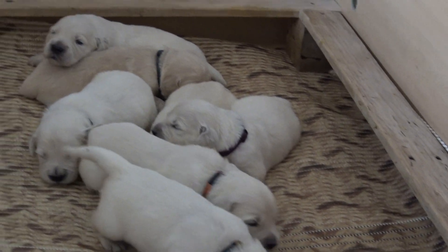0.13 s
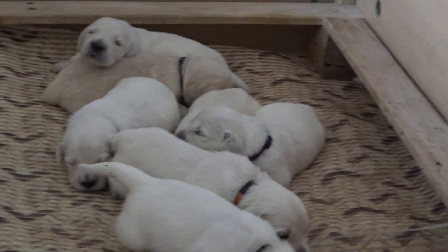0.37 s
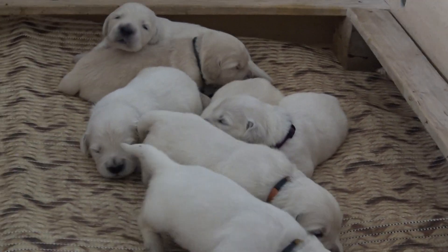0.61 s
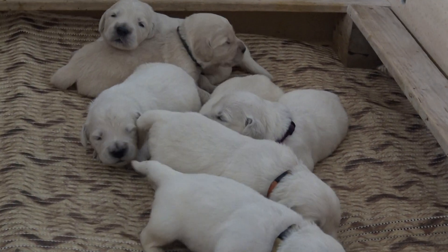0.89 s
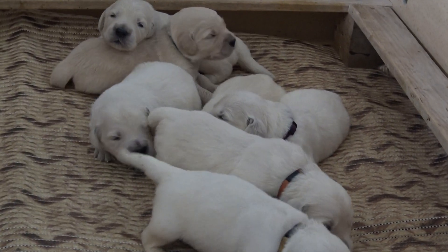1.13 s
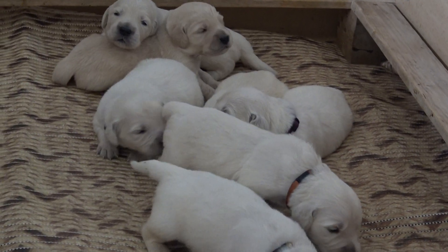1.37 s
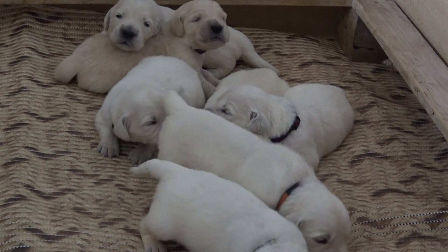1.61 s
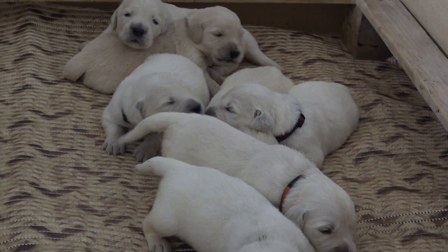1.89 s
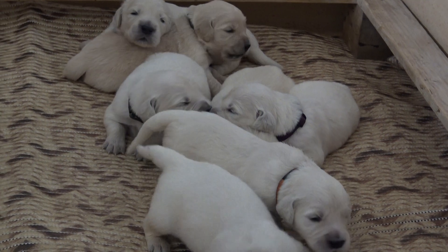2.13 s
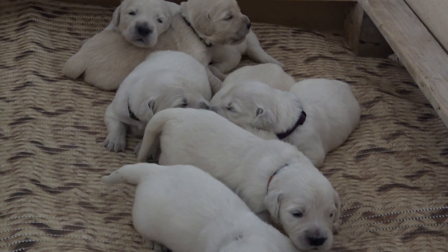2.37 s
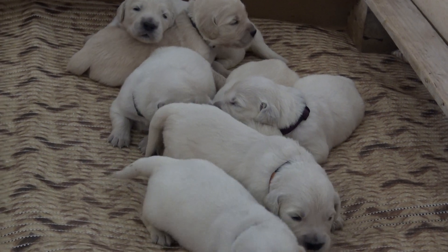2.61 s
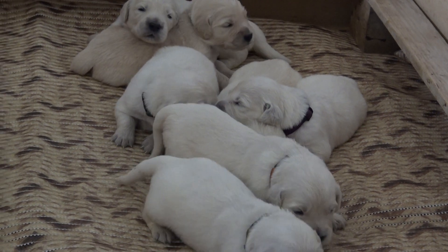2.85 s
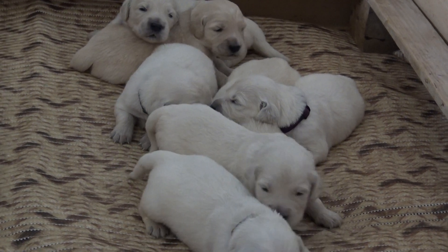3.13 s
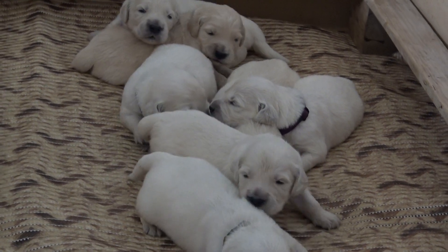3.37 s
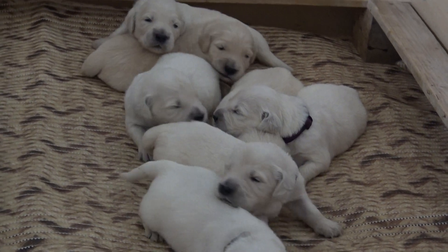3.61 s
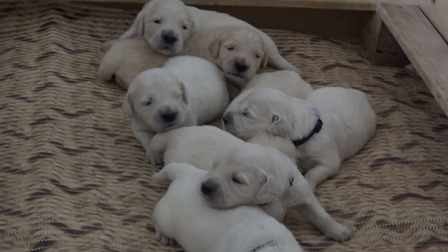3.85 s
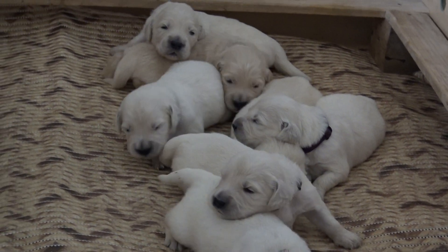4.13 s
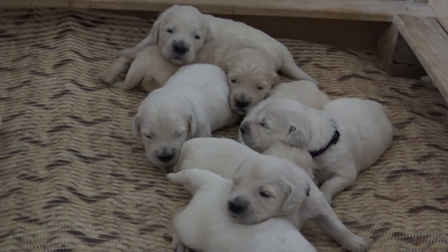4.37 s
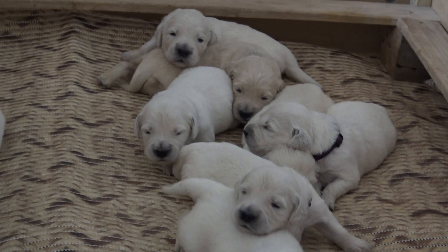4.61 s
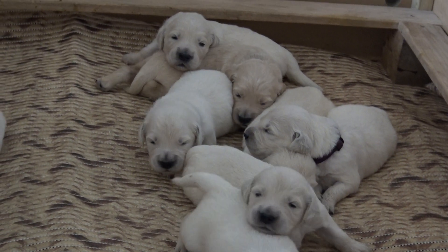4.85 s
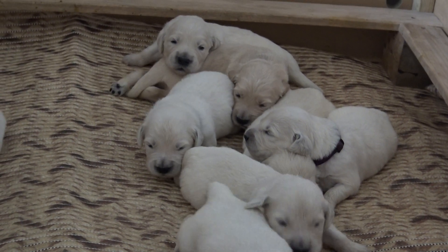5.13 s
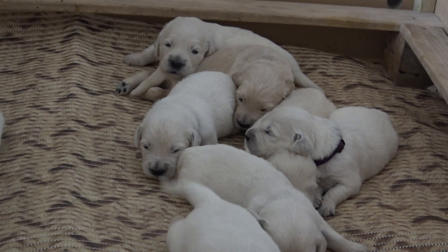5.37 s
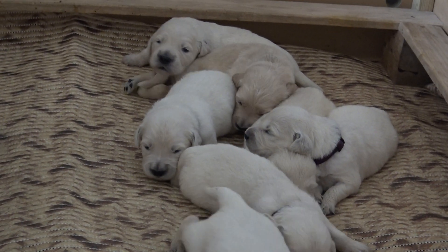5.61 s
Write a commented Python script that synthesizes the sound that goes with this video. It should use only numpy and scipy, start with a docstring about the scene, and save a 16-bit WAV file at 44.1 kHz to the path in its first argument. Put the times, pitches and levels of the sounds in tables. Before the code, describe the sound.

The stretch opens in the tail of a loud hoarse squeal, then further cries follow at an even pace, alternating forceful raspy ones with weaker, clearer whines. Between them come low muffled littermate grunts, tiny whimpers and light scratchy scuffs; a dull knock falls near the end as the last cry begins. The sound is near-centred, slightly distant, with a half-second room tail and almost silent background.

```python
"""Newborn puppy crying in a pen

A bare room, a wooden pen, two microphone ports a couple of metres off. About every 0.4 s the puppy cries:
partials on a running phase rise, jump to the first throat resonance, often turn hoarse and drop in pitch.
Behind it litter mates grunt and whimper with the same voice model through closed mouths; noise grains make paws
on the mat, damped swings make soft low knocks, narrow noise makes squeaks of indrawn air. Steady noise is the
room's air, and a tail of decaying noise bands rings on after every cry."""
import sys
import numpy as np
from scipy import signal
from scipy.fft import rfft, irfft, next_fast_len
from scipy.io import wavfile
from scipy.ndimage import uniform_filter1d, minimum_filter1d

SR = 44100
rng = np.random.default_rng(int(sys.argv[2]) if len(sys.argv) > 2 else 0)


def materialize(psi):
    """Save the field psi as 16-bit PCM at rate SR to the path in sys.argv[1].

    A 1-D psi becomes a single channel; in a 2-D psi each row is a channel.
    """
    bounded = np.clip(np.atleast_2d(psi).T, -1, 1)
    quanta = np.round(bounded * 32767).astype(np.int16)
    wavfile.write(sys.argv[1], SR, quanta)


def natural_amplitude(level_db):
    """Convert a level in decibels to a linear amplitude factor, elementwise."""
    exponent = np.asarray(level_db, float) / 20
    return 10 ** exponent


N = 252693
LEAD = SR // 4  # samples run ahead of time zero, cut off at the end
TIME = (np.arange(N + LEAD) - LEAD) / SR  # s
TOP_HZ = 16300  # limit of the voice partials and of the microphone channel

# steady air of the room, relative spectrum: (frequency [Hz], gain [dB])
AIR_TONE = [(15, -50), (25, -32), (150, -26.5), (230, -16), (489, -12.5), (1520, -27), (1890, -18),
            (3820, -26), (4490, -38), (5430, -28), (6050, -27.5), (10000, -33), (16000, -45)]
AIR_DB = -61.5  # rms

# decay of the room, one row a band from low to high: (nominal frequency [Hz], time to fall 60 dB [s])
ROOM_T60 = [(250, 0.45), (1000, 0.52), (2000, 0.4), (4000, 0.47), (8000, 0.38), (14000, 0.15)]
ROOM_DB, ROOM_GAP_S = -3.5, 0.0012  # tail level; wait for the first wall

# what the side signal keeps of its sources: (frequency [Hz], gain [dB])
SIDE_TONE = [(60, -15.5), (200, -29.5), (1000, -27), (2400, -23.5), (4400, -19), (8500, -11),
             (10500, -11.5), (12500, -22)]

# soft low bumps and knocks: (time [s], level before damping [dB], frequency [Hz])
BUMPS = [(.94, -56, 110), (1.005, -54.5, 80), (1.36, -50, 250), (5.513, -37.5, 348)]
BUMP_CYCLES = 1.4  # cycles in which a bump falls to 1/e

# paws and fur on the mat: (time [s], level before tone shaping [dB], decay [s])
SCUFFS = [(0.184, -60.5, 0.14), (0.852, -58, 0.047), (1.356, -65.5, 0.029), (1.51, -59, 0.04),
          (2.162, -57.5, 0.081), (2.311, -60, 0.049), (2.517, -55, 0.012), (2.977, -49, 0.047),
          (3.443, -68, 0.054), (4.18, -55.5, 0.043), (4.548, -52, 0.038), (5.344, -49, 0.006),
          (5.372, -51, 0.0044)]
# tone of the scuffs: (frequency [Hz], gain [dB])
SCUFF_TONE = [(100, -7), (400, 3.5), (1500, 16.5), (3000, 11), (6000, 6), (10000, -5), (15000, -22)]

# litter mates' grunts: (time [s], length [s], pitch [Hz], peak level of the fundamental [dB])
GRUNTS = [(0.351, 0.092, 265.5, -50.5), (0.939, 0.071, 249.8, -50), (1.527, 0.049, 205, -54),
          (1.764, 0.14, 264.5, -48.5), (2.172, 0.057, 247.4, -51), (2.447, .15, 268.5, -48),
          (3.086, 0.17, 247.5, -47.5), (3.59, .16, 252.6, -50.5), (4.065, 0.31, 262, -50),
          (4.726, 0.26, 261, -51.5), (5.619, 0.045, 252, -58)]
# course of every grunt: (time [share of length], pitch [share], level under the peak [dB], brightness [dB])
GRUNT_SHAPE = [(-.12, .97, -14, 2), (.08, .98, -3, 4), (.35, 1.02, 0, 3), (.75, 1, -4, 2),
               (1, .97, -14, -4)]
# litter mates' rising or level whimpers:
# (time [s], length [s], first pitch [Hz], last pitch [Hz], peak level of the fundamental [dB])
WHIMPERS = [(3.435, .06, 520, 800, -35), (1.04, .075, 395, 425, -47), (2.5, .07, 800, 790, -41)]
# the mates' closed mouths: (frequency [Hz], gain [dB])
NOSE = [(120, -9.5), (260, -1), (380, -2), (520, -11), (800, -5), (1600, -20.5), (3000, -41.5), (8000, -70)]
GRUNT_HOARSE, WHIMPER_HOARSE = 0.6, 0.2  # hoarseness 0-1, also the share of the second mode
WHIMPER_SWELL_DB, WHIMPER_FADE_DB = -8, -20  # first and last level against the peak

# squeaks of indrawn air after some cries: (time [s], level before halving [dB], frequency [Hz])
SQUEAKS = [(0.4594, -45, 14700), (1.3044, -48, 15200), (1.7115, -51, 14400), (2.137, -52, 14700),
           (2.9931, -59, 14100)]
SQUEAK_S = 0.007  # from the peak to 1/e

# one row a cry: (hoarseness scale [0-1], hoarse spell [s], extra brightness above the register [dB],
# course up to the closing break as points (time [s], pitch [Hz], level of the fundamental [dB]))
CRIES = [ (0.64, 0.177, -2, [(-.2, 950, -36), (-.15, 1411, -26), (-.1, 1550, -18.5), (.01, 1510, -36.5),
         (.04, 1452, -26)]), (0.79, 0.101, 0.5, [(.2, 896, -49), (.225, 1012, -28.5), (.24, 1097, -29.5),
         (.252, 1312, -28), (.285, 1462, -11), (.345, 1693, -30), (.39, 1583, -31), (.43, 1437, -24.5)]),
         (0.33, 0.052, -6, [(.625, 786, -41), (.675, 1013, -29.5), (.685, 1108, -34.5), (.697, 1292, -28.5),
         (.74, 1418, -32), (.78, 1319, -23.5), (.81, 1245, -37), (.835, 1227, -32)]),
         (0.7, 0.0684, 0, [(1.03, 855, -42), (1.066, 1149, -34), (1.08, 1235, -37.5), (1.095, 1409, -23),
         (1.12, 1579, -16.5), (1.155, 1692, -27.5), (1.2, 1705, -29), (1.29, 1438, -32.5)]),
         (0.59, 0.066, -3, [(1.468, 851, -45), (1.505, 1105, -33.5), (1.522, 1165, -29.5),
         (1.53, 1388, -39), (1.555, 1349, -23.5), (1.575, 1470, -15), (1.6, 1620, -22.5),
         (1.695, 1462, -27)]), (0.827, 0.097, 1.5, [(1.872, 879, -42), (1.89, 990, -31),
         (1.915, 1111, -35.5), (1.93, 1355, -28.5), (1.965, 1495, -15.5), (2.0, 1615, -27),
         (2.04, 1622, -39), (2.118, 1486, -24.5)]), (.02, 0.028, -4.5, [(2.298, 926, -43.5),
         (2.32, 918, -34), (2.35, 1075, -31.5), (2.375, 1206, -35), (2.405, 1363, -27), (2.445, 1335, -28),
         (2.475, 1205, -33.5), (2.51, 1020, -30.5)]), (0.28, 0.073, 2, [(2.685, 928, -41.5),
         (2.71, 1053, -31.5), (2.727, 1352, -40), (2.74, 1436, -23.5), (2.78, 1519, -13),
         (2.81, 1549, -26.5), (2.825, 1771, -29.5), (2.9, 1700, -35.5), (2.97, 1576, -40)]),
         (0.0072, 0.038, -1.5, [(3.15, 841, -54), (3.17, 862, -37), (3.2, 1074, -31), (3.215, 1220, -41.5),
         (3.228, 1394, -31), (3.265, 1457, -20), (3.31, 1436, -26.5), (3.395, 1202, -34.5)]),
         (0.41, .12, 3, [(3.555, 848, -43), (3.6, 1068, -34), (3.612, 1370, -37.5), (3.635, 1503, -13),
         (3.66, 1567, -23), (3.675, 1613, -25.5), (3.77, 1556, -37), (3.815, 1490, -31.5)]),
         (0.034, 0.028, 3.5, [(3.978, 803, -38.5), (4.0, 911, -28), (4.018, 1066, -26.5),
         (4.035, 1281, -39), (4.055, 1417, -25.5), (4.08, 1440, -19.5), (4.12, 1404, -31),
         (4.17, 1313, -26)]), (0.39, 0.077, 0.5, [(4.325, 815, -39), (4.355, 962.5, -22.5),
         (4.372, 1087, -26), (4.382, 1367, -31.5), (4.41, 1424, -14.5), (4.445, 1530, -20.5),
         (4.5, 1498, -30.5), (4.555, 1413, -27)]), (0.47, .04, -4, [(4.722, 776, -44), (4.775, 978, -26),
         (4.805, 1051, -34), (4.815, 1030, -29), (4.822, 1358, -26.5), (4.87, 1427, -30.5),
         (4.905, 1350, -28), (4.928, 1238, -24)]), (0.74, .03, -1.5, [(5.09, 739.3, -44), (5.128, 933, -25),
         (5.15, 1062, -28.5), (5.165, 1242, -21.5), (5.2, 1467, -12), (5.24, 1446, -44),
         (5.27, 1476, -24.5), (5.29, 1318, -26.5)]), (0.58, 0.057, -1.5, [(5.488, 895, -45),
         (5.51, 990, -25.5), (5.527, 1067, -24.5), (5.54, 1387, -19), (5.57, 1513, -13.5),
         (5.6, 1618, -15.5), (5.62, 1727, -28.5), (5.7, 1717, -26)]), ]
# strength of the slower fold mode in each cry in turn, scaled further by its hoarseness: (level [dB])
LOW_MODE_DB = [0.5, -1, -0.5, 1.5, 3.5, 1.5, -12, 10.5, -4, 2.5, 9, 1.5, -7, -3, 2.5]
# the closing break: (time after the last point [s], pitch [share of the last], level against the last [dB])
BREAK = [(.007, .72, -10), (0.023, 0.612, -14.5)]
# mouth opening with pitch, which lets the upper partials out: (pitch [Hz], brightness [dB])
MOUTH = [(850, -16.5), (1000, -6), (1100, -3.5), (1300, 9), (1500, 5), (1700, 3.5)]
# the crying puppy's throat and mouth, peaks of a short tube and valleys: (frequency [Hz], gain [dB])
THROAT = [(150, -38.5), (500, -19.5), (950, -8), (1500, 5), (1950, -4.5), (2450, -16.5), (2950, -30),
          (3700, -33), (4430, -16.5), (5200, -31), (7250, -20.5), (8700, -32), (9300, -36), (10300, -37),
          (11300, -44.5), (14500, -50.5), (16000, -89)]
LOW_MODE_HZ = 975  # the slower way the folds can swing
LOCK_HZ = 1530  # above this pitch one fold stays locked to the first throat resonance
REGISTER_HZ, REGISTER_WIDTH_HZ = 1130, 100  # where the upper register begins, and its blend
CLEAR_HOARSE, LASTING_HOARSE = 0.06, 0.15  # shares of hoarseness in the low register and late in the cry
LOW_MODE_LASTS = 0.17  # share of the slower mode left late in the cry
CLOSING_DB = -15.5  # brightness change from the last point on
FULL_CRY_DB = -15  # level at which effort leaves the slope alone
MUFFLE = 0.45  # dB an octave of extra slope for each dB that the mouth is closed

CEILING, LOPSIDED = 0.37, 0.01  # limiter peak; share of squared sound in the microphone


def gain_at(points, hz):
    """Gain of (Hz, dB) points joined on a log-frequency axis."""
    at, db = np.transpose(points)
    return natural_amplitude(np.interp(np.log(hz), np.log(at), db))


def colour(x, points):
    """Shape the spectrum of a signal by (Hz, dB) points."""
    size = next_fast_len(len(x) + 999)
    bins = np.maximum(np.arange(size // 2 + 1) * SR / size, 1)
    return irfft(rfft(x, size) * gain_at(points, bins), size)[:len(x)]


def wobble(size, hz):
    """Random motion up to about hz, spread 1."""
    lowpass = signal.butter(2, hz, fs=SR, output="sos")
    x = signal.sosfilt(lowpass, rng.standard_normal(size + 999))[999:]
    return x / x.std()


def air():
    """The faint steady noise of the room."""
    x = colour(rng.standard_normal(len(TIME)), AIR_TONE)
    return natural_amplitude(AIR_DB) * x / x.std()


def room(x):
    """Diffuse tail: noise dying away band by band, after the first wall's delay."""
    t = np.arange(int(0.9 * SR)) / SR
    edges = [40, 500, 1400, 2800, 5600, 11000, 18000]  # Hz
    tail = 0
    for (_, t60), low, high in zip(ROOM_T60, edges, edges[1:]):
        bandpass = signal.butter(2, [low, high], "bandpass", fs=SR, output="sos")
        band = signal.sosfilt(bandpass, rng.standard_normal(len(t)))
        fade = np.exp(-np.log(1000) * t / t60)
        tail = tail + band * fade / np.sqrt(np.sum(fade ** 2))
    onset = np.clip(t / ROOM_GAP_S - 1, 0, 1)
    return signal.fftconvolve(x, tail * onset)[:len(x)]


def bumps():
    """Dull knocks: one heavily damped swing each."""
    out = 0
    for s, db, hz in BUMPS:
        turns = np.maximum(TIME - s, 0) * hz
        envelope = np.minimum(turns, 1) * np.exp(-turns / BUMP_CYCLES)
        out = out + natural_amplitude(db) * envelope * np.sin(2 * np.pi * turns)
    return out


def scuffs():
    """Short bursts of dense scratch grains that start sharply and die away."""
    grains = rng.standard_normal(len(TIME)) * natural_amplitude(5.17 * wobble(len(TIME), 590))
    shape = 0
    for s, db, decay_s in SCUFFS:
        age = np.maximum(TIME - s, 0)
        shape = shape + natural_amplitude(db) * np.minimum(age / 0.003, 1) * np.exp(-(age / decay_s) ** 2)
    return colour(grains * shape, SCUFF_TONE)


def stack(phase, hz, slope_db, bright_db, count):
    """Partials on a running phase, sloped by slope_db an octave and spread over the cycle."""
    order = np.arange(1, count + 1)[:, None]
    weight = natural_amplitude(slope_db * np.log2(order) + bright_db * (order > 1)) * (order * hz < TOP_HZ)
    return (weight * np.cos(order * phase + 0.38 * order ** 2)).sum(axis=0)


def voice(calls, tract, tilt_db, effort, drift, jitter, shimmer, second, second_hz, lock_hz,
          breath_db, flutter_hz):
    """Vocal folds as partials; hoarse folds lose time, swing in a second mode as well and leak air."""
    out = np.zeros(len(TIME))
    for call in calls:
        s, *columns = np.transpose(call)
        inside = np.flatnonzero((TIME > s[0] - 0.006) & (TIME < s[-1] + 0.03))
        t = TIME[inside]
        hz, db, hoarse, bright_db, low_mode = (np.interp(t, s, c) for c in columns)
        hoarse = np.clip(hoarse, 0, 1)

        # a fall of more than a fifth of the pitch is a break into the lower mode, not a glide
        points_hz = columns[0]
        for k in np.flatnonzero(points_hz[1:] < 0.8 * points_hz[:-1]):
            hz[(t > s[k]) & (t < s[k + 1])] = points_hz[k + 1]
        hz = uniform_filter1d(hz, size=SR // 250)
        # the voice drops out during the break
        pitch_speed = np.gradient(np.log(hz)) * SR
        hold = uniform_filter1d(np.exp(-(pitch_speed / 40) ** 2), size=SR // 500)

        def running_phase(pitch):
            unsteady = drift * wobble(len(t), 53) + jitter * hoarse * wobble(len(t), flutter_hz)
            return 2 * np.pi / SR * np.cumsum(pitch * (1 + unsteady))

        phase = running_phase(hz)
        locked = running_phase(np.minimum(hz, lock_hz))

        # more effort closes the folds harder and lifts the upper partials
        slope_db = tilt_db + effort * (db - FULL_CRY_DB) + MUFFLE * np.minimum(bright_db, 0)
        # the locked fold beats with the free one
        split = 0.22 * np.clip((hz - lock_hz) / 120, 0, 1)
        folds = stack(phase, hz, slope_db, bright_db, count=18)
        folds += split * stack(locked, hz, slope_db, bright_db, count=7)
        folds *= 1 + hoarse * shimmer * wobble(len(t), flutter_hz)

        # the slower mode comes and goes; it sounds alone and as sum and difference tones
        low = 2 * np.pi / SR * np.cumsum(second_hz * (1 + 0.282 * hoarse ** 2 * wobble(len(t), 191)))
        strength = second * low_mode * natural_amplitude(5.96 * wobble(len(t), 110) + 0.82 * (db - db.max()))
        folds += strength * (np.cos(locked + low) + 0.049 * np.cos(locked - low)
                             + 0.042 * np.cos(low) + 0.056 * np.cos(2 * low))
        upper_tones = sum(np.cos(k * phase - low) + np.cos(k * phase + low) for k in range(2, 7))
        folds += 0.15 * strength * natural_amplitude(bright_db) * upper_tones

        # air escapes once a cycle, while the folds stand open
        leak = natural_amplitude(breath_db + bright_db) * (hoarse + 0.03) * (1 + np.cos(phase))
        folds += leak * rng.standard_normal(len(t))

        fade_in = np.clip((t - s[0]) / 0.0013 + 1, 0, 1)
        fade_out = np.clip((s[-1] - t) / 0.0016 + 1, 0, 1)
        # dividing by the tract's gain keeps the fundamental at its own level
        level = np.sqrt(2) * natural_amplitude(db) / gain_at(tract, hz)
        out[inside] += folds * hold * fade_in * fade_out * level
    return colour(out, tract)


def grunt(s, length, hz, db):
    """Voice controls (s, Hz, dB, hoarseness, brightness dB, second mode) of one grunt."""
    return [(s + at * length, share * hz, db + down, GRUNT_HOARSE, bright_db, GRUNT_HOARSE)
            for at, share, down, bright_db in GRUNT_SHAPE]


def whimper(s, length, first_hz, last_hz, db):
    """Voice controls of one whimper: it swells, reaches its pitch and fades."""
    course = [(s, first_hz, db + WHIMPER_SWELL_DB),
              (s + 0.776 * length, last_hz, db),
              (s + length, last_hz, db + WHIMPER_FADE_DB)]
    return [point + (WHIMPER_HOARSE, 0, WHIMPER_HOARSE) for point in course]


def litter_mates():
    """Grunts and whimpers: unsteady folds heard through closed mouths."""
    calls = [grunt(*g) for g in GRUNTS] + [whimper(*w) for w in WHIMPERS]
    return voice(calls, NOSE, tilt_db=-2.0, effort=0.0077, drift=0.036, jitter=0.07, shimmer=0.85,
                 second=0.34, second_hz=133.0, lock_hz=TOP_HZ, breath_db=-25.0, flutter_hz=79.0)


def squeaks():
    """Indrawn air: narrow noise near 15 kHz, about 15 ms long."""
    out = 0
    for s, db, hz in SQUEAKS:
        shape = natural_amplitude(db) * np.exp(-((TIME - s) / SQUEAK_S) ** 2)
        out = out + shape / 2 * wobble(len(TIME), 70) * np.cos(2 * np.pi * hz * TIME)
    return out


def cry(hoarseness, hoarse_s, open_db, course, low_db):
    """Voice controls, columns as in grunt(), of one cry ending in the break to the low mode."""
    last_s, last_hz, last_db = course[-1]
    closing = [(last_s + dt, share * last_hz, last_db + down) for dt, share, down in BREAK]
    s, hz, db = np.transpose(course + closing)
    # hoarseness sets in with the jump above the register and then clears
    upper = np.clip((hz - REGISTER_HZ) / REGISTER_WIDTH_HZ, 0, 1)
    clearing = np.exp(-((s - s[upper.argmax()]) / hoarse_s) ** 4)
    bright_db = np.interp(hz, *np.transpose(MOUTH)) + open_db * upper + CLOSING_DB * (s >= last_s)
    hoarse = hoarseness * (CLEAR_HOARSE + upper * np.maximum(clearing, LASTING_HOARSE))
    low_mode = hoarseness * natural_amplitude(low_db) * upper * np.maximum(clearing, LOW_MODE_LASTS)
    return np.transpose([s, hz, db, hoarse, bright_db, low_mode])


def puppy_cries():
    """The crying puppy: strong folds, a slower second mode and leaking air through an open throat."""
    calls = [cry(*c, low_db) for c, low_db in zip(CRIES, LOW_MODE_DB)]
    return voice(calls, THROAT, tilt_db=-0.66, effort=0.012, drift=0.0052, jitter=0.05, shimmer=1.2,
                 second=3.02, second_hz=LOW_MODE_HZ, lock_hz=LOCK_HZ, breath_db=-17, flutter_hz=260)


def scene():
    """Puppies near the middle; the two microphone ports differ a little, mostly in the room's sound."""
    near = puppy_cries() + litter_mates() + scuffs() + bumps()
    # squeaks are too high and faint to ring the room
    mid = near + natural_amplitude(ROOM_DB) * room(near) + air() + squeaks()
    side = colour(-0.4 * near + 0.4 * room(near) + air(), SIDE_TONE)
    return np.array([mid + side, mid - side])[:, LEAD:]


def roll_off(x):
    """The treble ends steeply here."""
    return signal.sosfilt(signal.butter(12, 16370, fs=SR, output="sos"), x)


def record(dry):
    """The microphone bends loud peaks a little, a fast limiter holds them and a steep filter cuts the top."""
    bend = signal.sosfilt(signal.butter(1, 20, "highpass", fs=SR, output="sos"), dry ** 2)
    # both ports share one gain, lowest over 5 ms and then smoothed over 5 ms
    allowed = np.minimum(CEILING / (np.abs(dry).max(axis=0) + 1e-9), 1)
    gain = uniform_filter1d(minimum_filter1d(allowed, size=SR // 200), size=SR // 200)
    limited = gain * (dry + LOPSIDED * bend)
    mix = signal.sosfilt(signal.ellip(8, 0.2, 70, TOP_HZ, fs=SR, output="sos"), limited)
    return roll_off(mix)


dry = scene()
out = record(dry)
materialize(out)
```